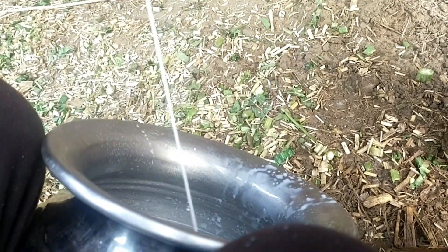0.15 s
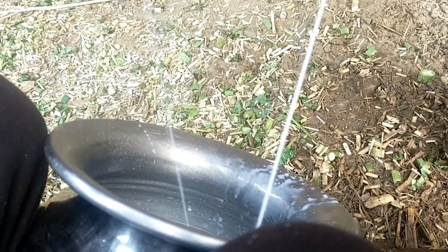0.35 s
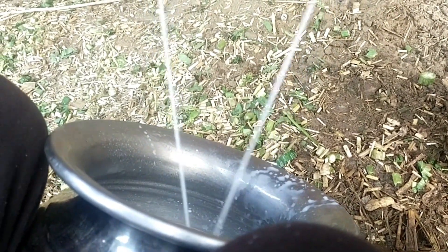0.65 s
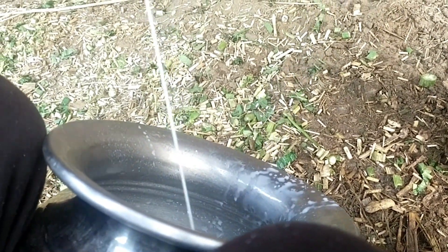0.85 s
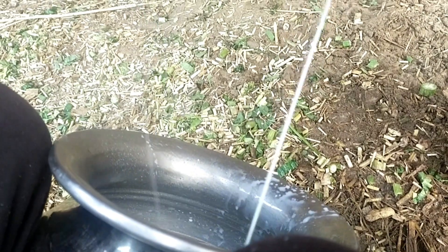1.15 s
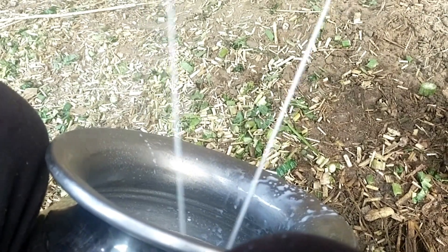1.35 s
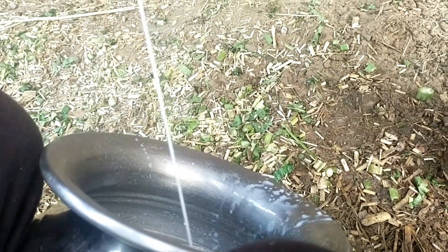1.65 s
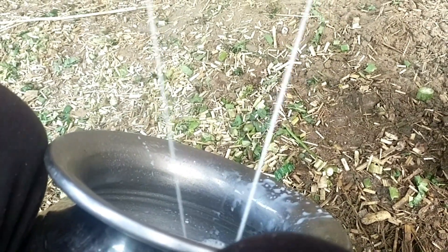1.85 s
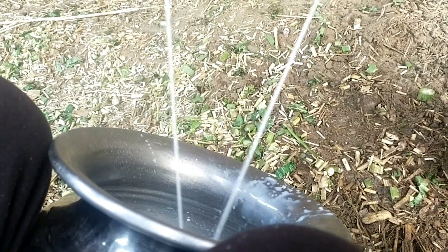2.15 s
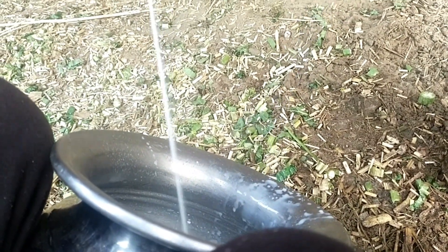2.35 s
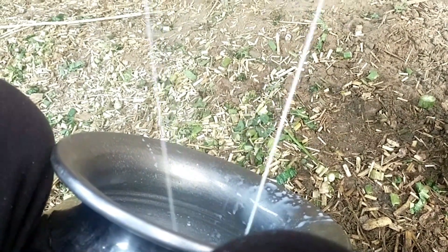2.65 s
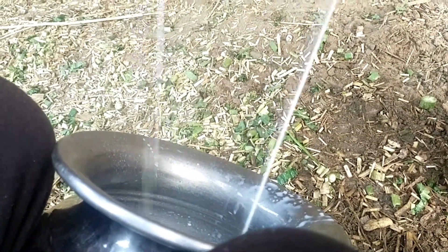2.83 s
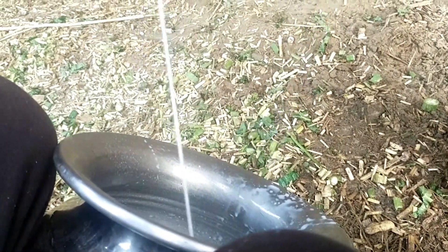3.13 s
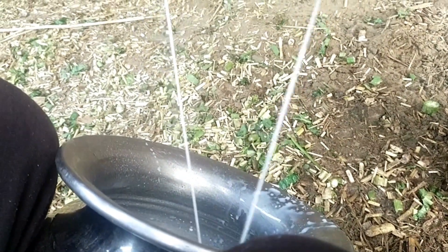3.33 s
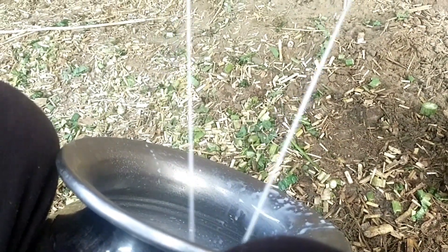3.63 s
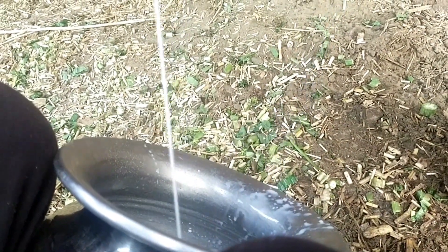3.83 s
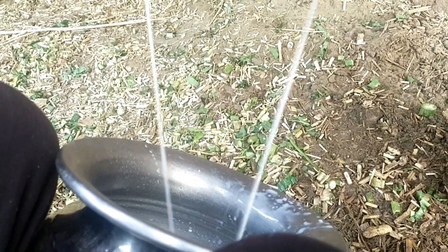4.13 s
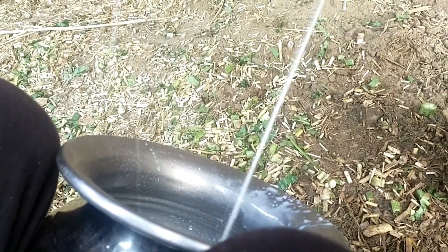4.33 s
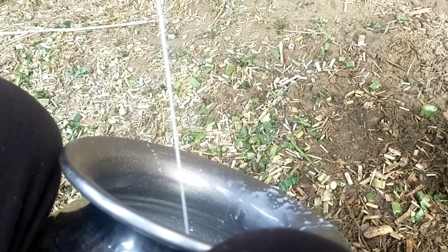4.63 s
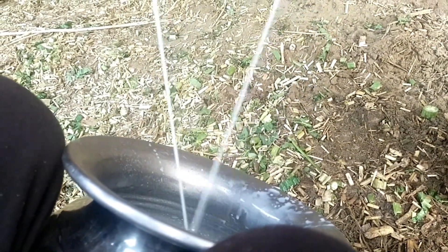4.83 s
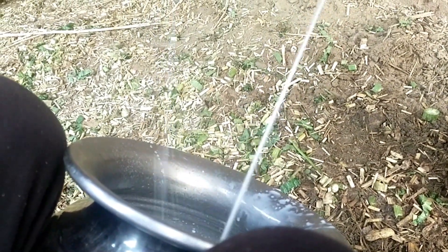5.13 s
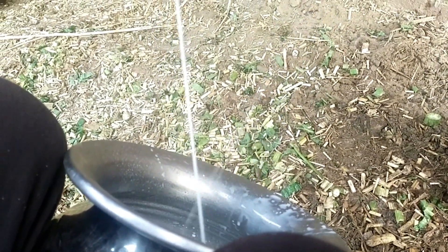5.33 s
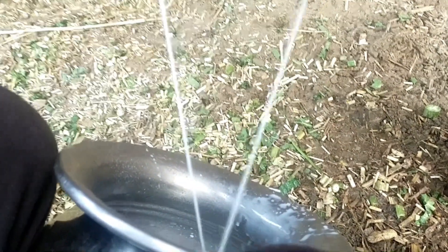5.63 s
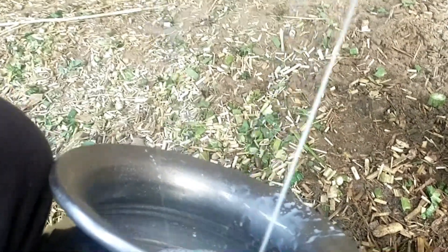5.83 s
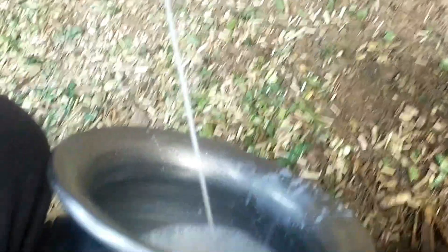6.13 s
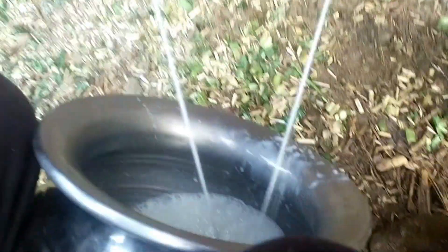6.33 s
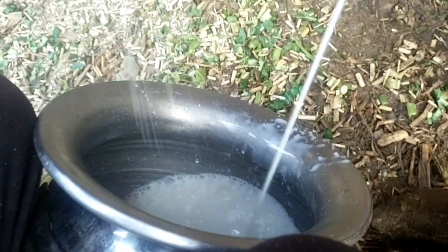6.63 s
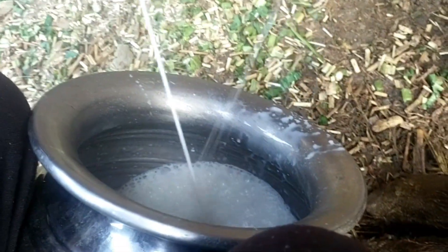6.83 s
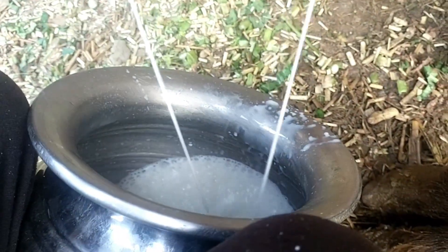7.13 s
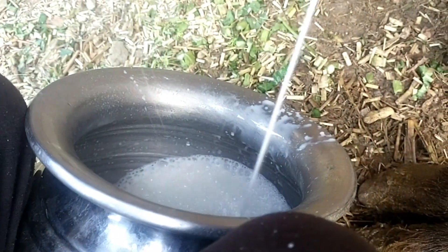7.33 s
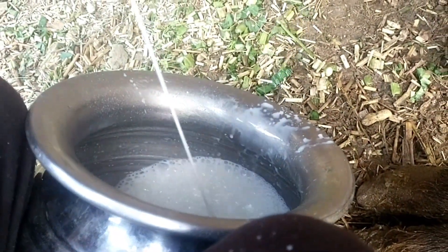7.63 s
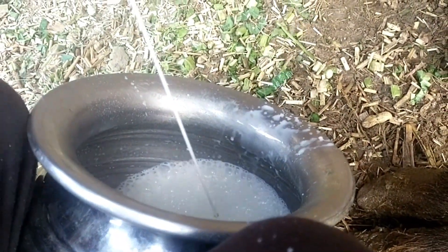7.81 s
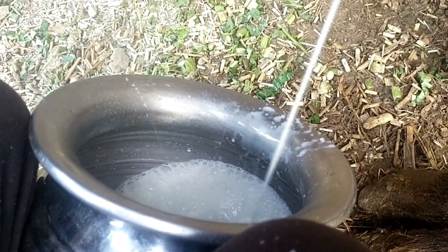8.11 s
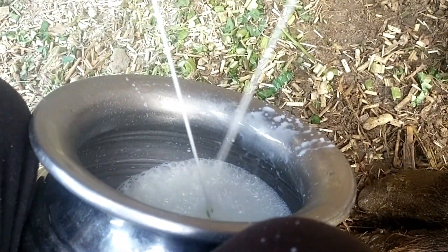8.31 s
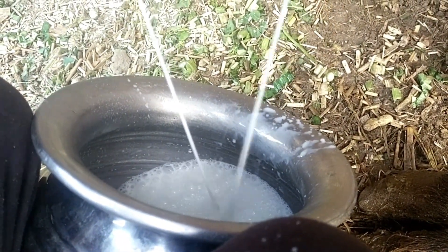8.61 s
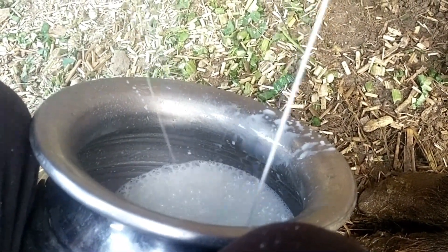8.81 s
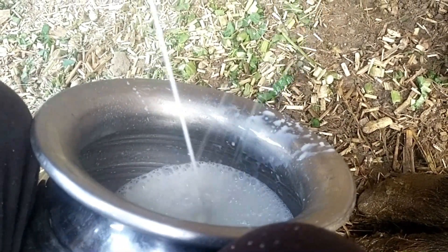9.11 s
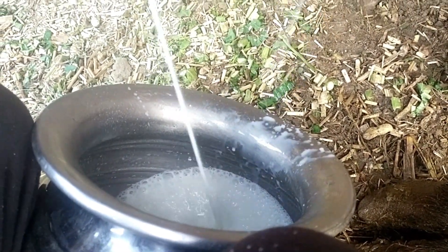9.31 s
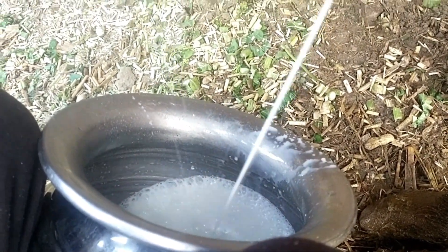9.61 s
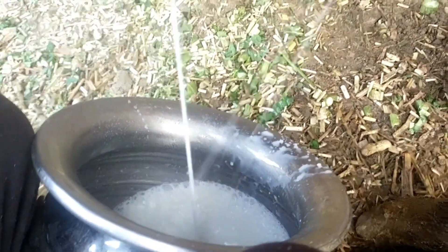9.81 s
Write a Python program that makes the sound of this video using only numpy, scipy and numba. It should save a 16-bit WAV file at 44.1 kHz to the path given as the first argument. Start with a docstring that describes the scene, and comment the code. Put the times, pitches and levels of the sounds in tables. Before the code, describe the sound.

Two hand-milked jets squirt in quick alternation into a frothy metal pot, with hollow boom, bright hissing splash, gulping bubbles and small plops.

```python
"""A hollow, milky boom and a bright splash open the scene: two hand-milked jets take turns plunging into froth.
The pot is metal and narrow-necked, and stands outdoors over a faint low rumble.
Torn noise, the churning milk, drives banks of resonances: boom, ring of the neck, splash and fizz.
Big bubbles gulp as decaying sines; slugs of milk plop in as short sine bursts with spatter.
The left microphone faces the pot's mouth, the right one is shaded."""
import sys
import numpy as np
from scipy import signal
from scipy.fft import rfft, irfft
from scipy.io import wavfile
from scipy.ndimage import uniform_filter1d
from numba import njit

SR = 44100
rng = np.random.default_rng(int(sys.argv[2]) if len(sys.argv) > 2 else 0)


def transcribe(u):
    """Save the signal u as a 16-bit wav file named by the first command-line argument.

    u: samples, shape (n,) or (channels, n), limited to [-1, 1]; the rate is SR.
    q: integer samples, one column per channel.
    """
    v = np.clip(np.atleast_2d(u).T, -1, 1)
    q = np.round(v * 32767).astype(np.int16)
    wavfile.write(sys.argv[1], SR, q)


N = 439236
STEP = 20   # samples between the points of slow controls


def from_db(db):
    """Decibels to gain."""
    return 10 ** (np.asarray(db) / 20)


def rms_one(x):
    """Scale to unit power."""
    return x / np.sqrt(np.mean(x ** 2) + 1e-20)


def at_hz(points, hz):
    """Read a (Hz, value) table on a log frequency axis."""
    points = np.array(points)
    return np.interp(np.log(hz), np.log(points[:, 0]), points[:, 1])


def over_time(points):
    """Read a (seconds, value) table at every sample."""
    return np.interp(np.arange(N) / SR, *np.transpose(points))


def drift(rate_hz):
    """Slow chance of spread 1: sparse noise through a double one-pole low-pass."""
    r = np.exp(-2 * np.pi * rate_hz * STEP / SR)
    noise = rng.standard_normal(N // STEP + 4002)
    slow = signal.lfilter([1], [1, -2 * r, r * r], noise)[4000:]   # drop the settling of the filter
    return np.interp(np.arange(N) / STEP, np.arange(len(slow)), rms_one(slow - slow.mean()))


def resonance(x, hz, width_hz):
    """Two-pole resonance with unit gain on top."""
    r = np.exp(-np.pi * width_hz / SR)
    feedback = [1, -2 * r * np.cos(2 * np.pi * hz / SR), r * r]
    return signal.lfilter([(1 - r * r) / 2, 0, (r * r - 1) / 2], feedback, x)


# Balance between the microphone facing the pot and the shaded one.
# Each row: frequency in Hz, left over right in dB.
MICROPHONE_SHADE = [(60, 0), (100, -1), (220, -4.5), (600, -0.5), (1100, 3.5), (1550, -4), (2000, 5),
                    (2700, 0), (3450, 15), (4050, 7), (5050, 8), (5650, 22), (6800, 11), (11500, 14),
                    (15000, 7)]


def shaded(hz):
    """Left and right gains at a pitch: the balance is split evenly, half up on the left, half down on the right."""
    return from_db(at_hz(MICROPHONE_SHADE, hz) * np.array([[.5], [-.5]]))


# Tone of the open air. Each row: frequency in Hz, relative level in dB per Hz.
YARD_SPECTRUM = [(12, -46), (43, -25), (90, -4), (120, -30), (200, -120)]
YARD_DB = -63   # level of the whole rumble


def yard():
    """Faint low rumble of the open air: shaped noise, nearly the same on both sides."""
    middle, side = rng.standard_normal((2, N))
    white = middle + 0.083 * side * [[1], [-1]]
    hz = np.maximum(np.fft.rfftfreq(N, 1 / SR), 1)
    rumble = irfft(rfft(white) * from_db(at_hz(YARD_SPECTRUM, hz)), N)
    return from_db(YARD_DB) * rms_one(rumble)


# Big bubbles gulping under the froth, ringing the air in the pot.
# Each row: start in seconds, peak level in dB before shade and low cut, pitch in Hz.
BUBBLE_GULPS = [(0.109, -0.5, 290), (0.188, -26, 283), (0.374, -20, 616), (0.523, -9, 308),
                (0.636, -13, 294), (0.784, -4, 298), (1.03, -9, 240), (1.191, -16, 570), (1.274, -10, 275),
                (1.41, -20, 646), (1.488, -9.5, 633), (1.535, -0.5, 300), (1.888, -13, 567),
                (1.901, -6.5, 298), (1.961, -16, 316), (1.993, -19, 570), (2.159, -4.5, 318),
                (2.264, -7, 251), (2.348, -14, 706), (2.415, -14, 606), (2.796, -3, 294), (2.957, -17, 579),
                (3.029, -5, 307), (3.073, -13, 576), (3.03, -11, 590), (3.109, -12, 276), (3.12, -15, 584),
                (3.218, -4, 286), (3.838, -12, 615), (3.93, -6, 607), (4.623, -13, 615), (4.659, -14, 615),
                (4.69, -12, 600), (4.738, -5, 275), (5.034, -13, 590), (5.269, -8, 292), (5.439, -3, 310),
                (6.64, -21, 689), (6.905, -19, 303), (7.404, -8, 259), (7.601, -25, 610), (8.029, -16, 530),
                (8.383, -14, 549), (8.414, -12, 556), (8.977, -6.5, 245), (9.002, -16, 552),
                (9.484, -15, 568), (9.568, -8.5, 297), (9.885, -24, 567)]
GULP_RISE, GULP_FALL = 0.27, 4   # time constants of swell and fade, in cycles
GULP_CUT_HZ = 170   # low cut keeps the gulps free of thumps


def gulps():
    """Trapped air rings like a struck bubble: each gulp swells within a cycle and dies away at its pitch."""
    length = 6000
    out, t = np.zeros((2, N + length)), np.arange(length) / SR
    for start_s, peak_db, hz in BUBBLE_GULPS:
        cycles = t * hz
        swell = (1 - np.exp(-cycles / GULP_RISE)) ** 2
        ring = swell * np.exp(-cycles / GULP_FALL) * np.sin(2 * np.pi * cycles)
        i = round(start_s * SR)
        out[:, i:i + length] += from_db(peak_db) * shaded(hz) * ring / ring.max()
    low_cut = signal.butter(4, GULP_CUT_HZ, "high", fs=SR, output="sos")
    return signal.sosfilt(low_cut, out[:, :N] + 1e-18)


# Slugs of milk plopping in. Each row: start in seconds, level of the whole slug in dB,
# pitch in Hz, relative level of its spatter in dB, length in seconds.
MILK_SLUGS = [(0.661, -2.5, 3220, -24, 0.011), (0.768, -6, 3470, 1.5, 0.0074),
              (1.379, -10, 3260, -18, 0.016), (1.491, -8.5, 1120, -21, 0.015),
              (1.528, -5, 1090, -19, 0.0094), (1.853, -2, 1010, -26, 0.0057), (1.886, -1, 1016, -26, 0.014),
              (1.925, -1, 1120, -13, 0.0073), (2.264, -12, 1030, -14, 0.0087),
              (2.416, -8, 1110, -9, 0.0093), (2.684, -3, 1020, -1, 0.0092), (2.864, -11, 2330, -12, 0.0093),
              (3.489, -9, 3370, -2, 0.0087), (3.936, -6, 1110, -6, 0.0065), (4.213, -5.5, 3580, -1, 0.008),
              (5.001, -3.5, 3460, -5, 0.0069), (5.03, -4.5, 1100, -5, 0.013),
              (5.385, 2.5, 1090, 0.5, 0.0051), (5.65, -2, 1066, -24, 0.016), (5.689, -1, 1003, -8, 0.013),
              (5.796, -4, 1070, -7, 0.0098), (5.836, -5, 1030, -21, 0.0095), (6.088, -5.5, 3730, -19, 0.01),
              (6.107, -2.5, 1150, -4, 0.0058), (6.136, -1, 1170, 2.5, 0.007),
              (6.195, -3, 5730, -11, 0.0043), (6.359, -1.5, 3600, 1, 0.011), (6.476, 6, 3250, -17, 0.0023),
              (6.516, 0, 1050, 1.5, 0.0071), (6.533, 4.5, 1070, -20, 0.0053), (6.544, 0, 3540, 1, 0.0052),
              (6.894, 3.5, 1200, -17, 0.0067), (7.247, -8, 1950, 4, 0.011), (7.268, 2.5, 2330, -5, 0.0039),
              (7.28, -7, 2440, -3, 0.009), (7.438, -9, 2410, -25, 0.013), (7.615, -1, 2410, -17, 0.019),
              (7.631, 2, 1160, -3, 0.0057), (7.832, -1.5, 920, -4.5, 0.0087), (8, 2, 1000, -10, 0.0057),
              (8.011, 0, 3760, 2.5, 0.0048), (8.036, -3.5, 3320, 0.5, 0.0068), (8.374, -5, 3600, 4, 0.014),
              (8.44, -15, 1130, -11, 0.0073), (8.466, -6, 1040, -15, 0.0048), (8.775, 0, 2400, 3.5, 0.0077),
              (9.022, -7, 1000, -4, 0.0059), (9.328, -1, 3660, -4, 0.0077), (9.497, -7.5, 3460, 5, 0.0089)]
# What the spatter rings. Each row: frequency in Hz, width in Hz, relative level in dB.
SPATTER_MODES = [(1150, 200, -6.5), (1780, 460, -8), (2200, 540, -2.5), (3660, 440, -3), (4300, 260, -8),
                 (5400, 430, -8)]
SPATTER_FADE = 1.1   # decay in nepers over the slug's length
SPATTER_DROPS_DB = 8.5   # unevenness of the spatter
PLOP_DB = -10   # trim of the ringing air pocket


def spatter_bursts(t):
    """Noise in uneven steps, one burst a slug, that swells, fades and rings the spatter resonances."""
    uneven = np.repeat(rng.standard_normal((len(MILK_SLUGS), 30)), 50, axis=1)
    noise = rng.standard_normal((len(MILK_SLUGS), len(t))) * from_db(SPATTER_DROPS_DB * uneven)
    length_s = np.array(MILK_SLUGS)[:, 4:]
    noise = t / length_s * np.exp(1 - SPATTER_FADE * t / length_s) * noise
    # before ringing, energy goes with length
    noise = noise * np.sqrt(length_s * SR / np.sum(noise ** 2, axis=1, keepdims=True))
    return sum((-1) ** k * from_db(level_db) * resonance(noise, hz, width_hz)
               for k, (hz, width_hz, level_db) in enumerate(SPATTER_MODES))


def slugs():
    """Each slug traps a pocket of air that rings inside a short burst of spatter."""
    out, t = np.zeros((2, N)), np.arange(1500) / SR
    for (start_s, level_db, hz, splash_db, length_s), burst in zip(MILK_SLUGS, spatter_bursts(t)):
        hump = np.sin(np.pi * np.minimum(t / length_s, 1)) ** 2
        plop = from_db(PLOP_DB) * shaded(hz) * hump * np.sin(2 * np.pi * hz * t)
        splash = from_db(splash_db + np.array([[1.5], [-5.0]])) * burst   # louder on the left
        i = round(start_s * SR)
        out[:, i:i + len(t)] += (from_db(level_db) * (plop + splash))[:, :N - i]
    return out


@njit
def wandering(x, twice_cos, r):
    """Two-pole resonance whose centre moves from sample to sample; unit gain on top."""
    y = np.zeros_like(x)
    for c in range(x.shape[0]):
        for i in range(2, x.shape[1]):
            fresh = (1 - r * r) / 2 * (x[c, i] - x[c, i - 2])
            y[c, i] = fresh + r * twice_cos[i] * y[c, i - 1] - r * r * y[c, i - 2]
    return y


# How alike the two microphones sound. Each row: frequency in Hz, likeness from 0 to 1.
SIDE_LIKENESS = [(60, .9), (300, .99), (600, .96), (1200, .8), (2400, .7), (5000, .6), (10000, .25)]
WANDER, WANDER_RATE_HZ = 0.015, 4   # slow random wander of the resonances: spread as a share of pitch
SKIRT = 5.65   # a second, wider pass darkens the valleys: its width over the first


def pot(drive, modes, patchy_db, patch_rate_hz, favoured_hz=None, focus_db=0):
    """Parallel resonances of the pot that share out a steady power, swelling and fading at random."""
    out, power = 0, 0
    detune = 1 + WANDER * drift(WANDER_RATE_HZ)
    for k, (hz, width_hz, level_db) in enumerate(modes):
        twice_cos = 2 * np.cos(2 * np.pi * hz * detune / SR)
        narrow = wandering(drive, twice_cos, np.exp(-np.pi * width_hz / SR))
        left, other = resonance(narrow, hz, SKIRT * width_hz)
        alike = np.clip(at_hz(SIDE_LIKENESS, hz), 0, 1)
        right = alike * left + np.sqrt(1 - alike ** 2) * other
        gain_db = level_db + patchy_db * drift(patch_rate_hz)
        if favoured_hz is not None:   # focus_db lost per tenth of an octave off the favoured pitch, up to three
            gain_db = gain_db - focus_db * np.minimum(10 * abs(np.log2(hz / favoured_hz)), 3)
        gain, shade = from_db(gain_db), shaded(hz)
        out = out + (-1) ** k * gain * shade * [left, right]
        power = power + gain ** 2 * width_hz * shade.sum() ** 2
    return out / np.sqrt(power)


def band(x, low_hz, high_hz):
    """Keeps the valleys between groups of resonances dark; the middle of the pair gets unit power."""
    x = signal.sosfilt(signal.butter(4, [low_hz, high_hz], "band", fs=SR, output="sos"), x)
    return x / np.sqrt(np.mean(x.mean(0) ** 2))


# Stretches of sound between changes of level or colour.
# Each row: start in seconds, middle level in dB of churn, belly, throat, neck, shoulder, lip, cheek, mouth,
# flare, rim, fizz and spray, start-to-end change in dB of belly, throat, splash and hiss, surge at the start in dB,
# favoured belly, neck and mouth pitch in Hz, mouth glide from first to second half in Hz, favoured rim pitch in Hz.
STRETCHES = [(0.0, -36, -14, -29, -32.5, -38.5, -34.5, -38.0, -27.5, -37, -28.5, -45, -42.5, 2.5, -14, -6.5, 2, 8, 295, 1100.0, 3450, 450.0, 5570),
             (0.2, -36, -14, -36.0, -36.5, -42.0, -45, -36.5, -28, -40.5, -27.5, -41, -42, -5, 3.0, -19, -8, -4, 288, 1030, 3820.0, -460.0, 5650),
             (0.4, -31, -14, -32.5, -30, -43.0, -36.0, -28.5, -28.0, -36, -23.5, -39, -40.5, -2.5, -4, -1.5, 2, 20, 290, 1160.0, 3140, 30.0, 5790.0),
             (0.61, -35.5, -12.0, -34.0, -34.5, -42, -32, -32, -27.5, -30.5, -28, -43, -46, -6, 8.0, -3, 1, 3, 293, 1140, 3180, -60.0, 5460.0),
             (0.74, -33, -12.5, -28.5, -28.5, -37, -30.5, -31, -27.5, -36.5, -33.5, -50, -44.0, -2.5, -19, -5, 1, 5, 308, 1100, 3530.0, 140.0, 5900),
             (0.87, -31.5, -15, -31.5, -24.5, -33.5, -32, -22, -21.5, -29.5, -24.5, -37, -41.0, -1, -8, 7, 4, -6, 284, 1046, 3800, 110.0, 5550),
             (1.04, -35.0, -12.5, -32.5, -26.5, -33.5, -42, -32, -31, -39.0, -28, -44, -40.5, 6, 4, 5, 2, -5, 290, 1064, 3300, -510.0, 5400),
             (1.23, -40, -11.5, -40, -36, -50.5, -44.5, -45, -29.5, -38, -31.5, -50.0, -49, -3, -11, -3, 3, -19, 282, 1115, 3100, -30.0, 5600),
             (1.41, -32.0, -11, -29, -36, -60, -40, -49.5, -40, -31.5, -32, -55, -52, 3, 6.5, -5, 0, 2, 283, 1070, 3460, 350.0, 5800.0),
             (1.51, -34, -17.5, -28, -26.5, -38, -32, -37, -26.5, -34, -28.5, -43, -41, 13, 16, -3, 2, -2, 300, 1095, 3500, 50.0, 5760),
             (1.64, -35.5, -14, -28.5, -28.5, -32, -29, -26.5, -21, -27, -25, -39, -36.5, 7, 7, 1, 1.5, -2, 288, 1044, 3800, 10.0, 5830),
             (1.82, -32, -14.5, -29, -25.5, -34.0, -41, -33, -29, -37, -27.5, -41, -42, 2, 13, 12, 5, -14, 293, 1040.0, 3870.0, 300.0, 5600),
             (1.98, -32, -14, -33, -35.5, -47, -37.5, -48, -37.5, -38, -31, -50.0, -49, -1, -1, -1, 7, 8, 296, 1045, 3470, 100.0, 5900),
             (2.16, -33, -14, -30.5, -34.5, -51, -35.5, -47.5, -38, -30.5, -29.5, -56, -47.5, 2, 1.0, -1, -2.0, 11, 307, 1030.0, 3620, -100.0, 5830),
             (2.29, -36, -14.5, -31.5, -31, -41.0, -36, -44, -31.5, -32, -32, -46, -45, 1, 1, 3, 10, 7, 292, 1020, 3430, 90.0, 5800),
             (2.47, -40, -17.5, -35, -29.0, -32.5, -32.5, -29, -20.5, -31, -23, -41, -42.5, 6.5, -14, -6.5, -11, -11, 286, 1000, 3770, 70.0, 5750),
             (2.73, -41, -14, -31, -36.0, -44, -39, -45, -35.5, -40, -33, -39, -47.5, 2, -10, -11, -8, 2, 287, 1070, 3100, -40.0, 5600),
             (2.86, -41, -15.0, -32, -32.5, -40.5, -27.5, -42, -25, -24.5, -25.5, -37, -39, 2, 12, 3.5, 2.5, 0.3, 287, 1090, 3320, 90.0, 5800),
             (3.2, -45.5, -19, -45, -35, -39.5, -39.5, -39, -27.5, -37, -26, -35.5, -42.5, -6.0, -12.5, -8, -10, -4, 280, 990, 3490, -30.0, 5700),
             (3.44, -40, -18.5, -34, -30.5, -35.5, -39, -43, -22, -35.0, -27, -33, -38.0, 10, 4.5, -3, 1.0, 12, 266, 1030.0, 3450, -150.0, 5250),
             (3.54, -42, -19.5, -47, -37.5, -48, -37.5, -35.5, -26.5, -29.5, -24.5, -35.5, -43, -8, 10, 1, -5, 4, 283, 1010, 3320.0, -290.0, 6000),
             (3.68, -43, -16.5, -34, -42, -55, -33.5, -49, -32.5, -29, -33.5, -40, -47.5, 7, -1, 1, -12, -1, 288, 1080, 3200, 20.0, 6200),
             (3.82, -32, -16, -26, -28, -40.0, -32.0, -46, -27.5, -29, -27.5, -39, -40, 5, 4, 1, 8, 10, 290, 1070, 3400, 310.0, 5800),
             (4.01, -37, -16.5, -44, -37.5, -39, -46, -35.5, -30, -33, -26.5, -37, -43, -10, 3, 1, 1.0, 0.3, 283, 1010, 3740, 0.0, 5650.0),
             (4.2, -39.5, -16, -27, -27, -31.5, -27.5, -34.5, -20, -41, -22, -35, -39, 10, 0.0, 3, 2, -0.5, 262, 1053, 3500, -160.0, 5600),
             (4.31, -41, -18, -35, -40, -41, -36, -42, -23, -27.5, -29, -37, -40, -2, -0.5, 4, -5, -2, 288, 1270, 3300, -30.0, 5650),
             (4.51, -32, -17, -27, -32.5, -39, -42.0, -57, -31, -28.5, -27, -41, -39.0, 10, 13, 1.5, -2, -7, 314, 1100, 3580, 140.0, 5740),
             (4.66, -44, -16, -28, -31, -45, -50.0, -55.0, -34.5, -39, -33.5, -39, -41.5, 2.0, 0, -6, -10, 0.3, 284, 1090, 3550.0, 30.0, 5850.0),
             (4.77, -37.5, -18.5, -34, -38.5, -51, -40, -45, -34.5, -41, -29.0, -40, -46.5, 0, 4, -3, -3, -2, 280, 1100, 3400, 40.0, 5600),
             (4.98, -42.0, -22.5, -28.5, -26, -32, -41.5, -36, -18.5, -32, -23.5, -36, -33.5, -1, -6, -2, -5, 10, 284, 1134, 3280, -100.0, 5600),
             (5.16, -33, -17.5, -31.5, -33, -42, -39.5, -55, -29.5, -26.5, -25, -37.5, -39, -6, -9, -5, -7, -14, 286, 1065, 3480, 50.0, 5600),
             (5.37, -36, -16.0, -29.5, -27, -40, -30, -47, -26.5, -28.5, -30.5, -36.5, -39.0, -1, -12, 10, -6, 7, 300, 1000, 3440.0, 110.0, 5750),
             (5.55, -38, -30.5, -38.5, -26.5, -36, -34, -37, -20.5, -29, -27, -33.5, -37.5, 6, 1.0, -4, 0, -2, 274, 1010, 3600, 30.0, 5160),
             (5.83, -36, -20.5, -34.5, -33.5, -47.5, -41.5, -39, -32.5, -33, -33, -41, -43.0, -2.5, 12, -3, 5, 11, 328, 1010, 3200, 20.0, 5300),
             (5.98, -30, -16.5, -37, -39, -54.0, -33, -35, -31.5, -27, -44, -50.5, -50.0, -5, -16, -7, -16, -2, 310, 1030.0, 3660.0, -170.0, 5800.0),
             (6.08, -31, -24, -29, -30.5, -37, -29, -33.5, -24.5, -28, -25.5, -35, -39, -3.5, -5, -8, -1, -4, 295, 1140, 3610.0, 20.0, 5800),
             (6.23, -40.5, -31.5, -39, -29.0, -35, -32.5, -30.5, -22, -28, -27.0, -42.5, -40.5, -4, 3, 7, 6, 2, 285, 1040, 3570.0, -110.0, 5430),
             (6.45, -36, -30.5, -28.5, -28.5, -29, -31, -28, -27, -37, -30.0, -45, -46, -3.0, -2, 2.5, -6, -11, 273, 1026, 3540, 130.0, 5600.0),
             (6.57, -40.5, -29.5, -35.5, -31, -38, -33.5, -35, -30.5, -32.5, -34.5, -48, -46.5, 13, -2, 3, -2, -8, 302, 1030, 3220.0, 190.0, 5630),
             (6.72, -44, -20.5, -30, -32.0, -43, -30.5, -31, -31, -30, -36.5, -47.0, -43.0, 5, -6, -6, -3, -14, 322, 1015, 3550, 90.0, 5280.0),
             (6.88, -38, -19, -31.5, -25.5, -34.5, -28.5, -35.5, -24, -25, -23.5, -40.5, -38.5, -3.5, -8, 1, 0.0, 14, 335, 1080, 3700, 20.0, 5580),
             (7.06, -44, -24.5, -36, -36, -34, -37.5, -45.0, -32, -37, -32, -48.0, -45, 7, 1, 0.0, -1, -9, 356, 960, 3520, -20.0, 5700),
             (7.24, -34, -28.5, -35.0, -30.0, -30, -29, -34.5, -22, -33.5, -33, -43.5, -41, -3.5, 3, -6, -2, 8, 293, 1010, 3470, -240.0, 5700),
             (7.33, -33.5, -21, -41.5, -32.5, -40, -30.5, -38.0, -32, -28, -34, -41.5, -42, 5, 16, 7, 2, -2, 274, 980, 3140, -180.0, 5130),
             (7.57, -34, -18.5, -24.5, -26, -42, -31, -33, -30.5, -31.5, -33, -42, -43.5, -4, 4, 15, 10, -11, 316, 1130, 3430.0, 50.0, 5400.0),
             (7.66, -37, -19.5, -33, -32, -36.5, -35, -46, -31, -32, -31.0, -49.5, -43, -18, -13, 3, -7, 8, 306, 1026, 3660, 160.0, 5370),
             (7.81, -39.5, -27, -35, -26, -29.5, -31, -40, -24.5, -27.5, -29, -51, -39.5, -2.5, -1, -0.5, -9, -4, 326, 950.0, 3600, 150.0, 5300),
             (7.97, -34, -26.5, -30, -24, -25.5, -24.5, -35, -20.5, -28, -37, -47, -42.5, -4, -1.0, 7, 0, 3, 280, 1010, 3500, -50.0, 5350.0),
             (8.07, -39, -24.5, -38.5, -35.0, -40.5, -32.0, -31, -25.5, -29.5, -32.5, -44, -43, 16, 12, 4, 1, 0.3, 264, 1044, 3530, 290.0, 5650.0),
             (8.36, -30.5, -21, -29, -23, -34.0, -33, -40, -28.0, -35, -31.5, -52, -43.5, -7.0, -7.5, 8, -2, -3, 285, 1050, 3630, 130.0, 5250),
             (8.53, -41, -29.0, -47, -21, -27.5, -27.5, -30, -19, -24, -21, -40, -37.5, -1.0, -5.0, 5, -4, 12, 280, 1010, 3940, 220.0, 5200),
             (8.64, -45.0, -27, -42, -26.5, -29, -29.5, -38, -24, -27, -26.5, -43, -38.5, 9, 27, -1.5, -7, -3, 300, 967, 3570, -60.0, 5250),
             (8.81, -37, -19.5, -35.5, -31, -40, -34.0, -34, -28, -33, -34.5, -44.5, -41.0, -8, 1.0, 1, 4, 11, 281, 1030, 3330.0, 20.0, 5790.0),
             (9.0, -35.5, -20, -28.0, -29, -39.5, -28.5, -34, -27, -30, -30, -48.5, -43.5, -6, -1, -4, 6, 1, 297, 1070, 3630, 10.0, 5380.0),
             (9.22, -43.5, -25, -41, -30.0, -29.5, -28.5, -34, -25, -28.5, -25, -44.5, -39, -13, 7, 4.5, 2, 17, 293, 944, 3600, -40.0, 5440),
             (9.47, -31, -22, -25.5, -29, -31, -31.5, -39, -25.5, -36, -32, -57.5, -43.5, 5.0, -9, -9, -3, -1, 310, 935, 3430, -170.0, 5500),
             (9.65, -35.0, -15, -30, -32, -42, -37, -34.0, -23.5, -26, -24, -40, -38.5, 6, -14, 4, 2.0, 3, 283, 960.0, 3200, 120.0, 5660.0),
             (9.76, -39, -16.5, -38, -33.0, -44, -44.5, -36.5, -33, -40, -26.5, -53, -47, -6, 4, -8, 0.5, -5, 269, 994, 3350, -0.0, 5700),
             (9.87, -34, -16.5, -29.5, -27, -34, -35, -35, -25.5, -33, -24.5, -53, -35, 0.5, -3, -6, -3, 8, 282, 1180.0, 3440, 0.0, 5800)]
EASE_S, SURGE_S = 0.053, 0.0053   # one stretch eases into the next; half width of the surge
THROAT_SURGE, LIP_SURGE, MOUTH_SURGE = 0.47, 0.39, 0.17   # shares of the surge, which the neck takes in full
FLICKER_DB, LOW_FLICKER_DB = 0.8, 1.5   # random level flicker of splash and hiss, and of throat
FLICKER_RATE_HZ = 6.0
NECK_FOLLOWS = 0.87   # share of the splash change, flicker included
CHURN_FOLLOWS_BELLY = 0.26   # share of the belly change


def levels_and_pitches():
    """Levels of each group in dB, stretch after stretch, and the favoured pitches in Hz."""
    start, *columns = np.transpose(STRETCHES)
    t = np.arange(0, N, STEP) / SR
    row = np.maximum(np.searchsorted(start, t, "right") - 1, 0)
    length = np.diff(start, append=N / SR)
    through = (t - start[row]) / length[row] - .5   # -0.5 to 0.5 across a stretch
    (churn, belly, throat, neck, shoulder, lip, cheek, mouth, flare, rim, fizz, spray,
     belly_change, throat_change, splash_change, hiss_change, _,
     belly_hz, neck_hz, mouth_hz, glide_hz, rim_hz) = (c[row] for c in columns)
    surge = columns[16] @ np.exp(-.5 * ((t - start[:, None]) / SURGE_S) ** 2)
    flicker = FLICKER_DB * drift(FLICKER_RATE_HZ)[::STEP]
    low_flicker = LOW_FLICKER_DB * drift(FLICKER_RATE_HZ)[::STEP]
    splash = splash_change * through + flicker
    hiss = hiss_change * through + flicker
    boom = belly_change * through
    levels = [churn + CHURN_FOLLOWS_BELLY * boom,
              belly + boom,
              throat + throat_change * through + THROAT_SURGE * surge + low_flicker,
              neck + NECK_FOLLOWS * splash + surge,
              shoulder + splash + surge,
              lip + splash + LIP_SURGE * surge,
              cheek + splash + LIP_SURGE * surge,
              mouth + splash + MOUTH_SURGE * surge,
              flare + splash,
              rim + hiss, fizz + hiss, spray + hiss]
    pitches = [belly_hz, neck_hz, mouth_hz + 2 * glide_hz * through, rim_hz]
    eased = uniform_filter1d(np.array(levels + pitches), max(int(EASE_S * SR / STEP), 1), axis=1)
    eased = [np.interp(np.arange(N) / SR, t, c) for c in eased]
    return eased[:12], eased[12:]


# Resonances of the pot that each motion of the milk excites, from low to high.
# Each row: frequency in Hz, width in Hz, relative level in dB.
CHURN_MODES = [(70, 160, -28), (122, 113, -8), (189.4, 32, -1.5)]
BELLY_MODES = [(226.7, 30.3, 1.5), (245, 29.8, 2), (282.3, 29, 6), (330.5, 77, -6), (377, 67, -3)]
UPPER_BELLY_MODES = [(392, 72, 0)]   # just above the belly
THROAT_MODES = [(573.3, 76, 27), (684, 435, 3)]
NECK_MODES = [(932, 114, -4.5), (991.5, 39, 2.5), (1073, 89, -5), (1216, 180, -1.5), (1308, 74, 6.5)]
SHOULDER_MODES = [(1646, 113, 0), (2048, 180, 0)]
LIP_MODES = [(2354, 166, 9.5), (2600, 140, 6.5)]
CHEEK_MODES = [(2500, 420, 1), (2816, 76, 0.3), (2956, 96, 0.55)]
MOUTH_MODES = [(3077, 46, 2.1), (3224, 95, 2.8), (3390, 61, 1.3), (3537, 88, 0.67), (3710, 120, 1),
               (3860, 230, 0.78), (3905, 320, 2.4)]
FLARE_MODES = [(4170, 140, -1), (4370, 120, 2), (4540, 170, 0), (4814, 78, -2)]
RIM_MODES = [(4920, 160, 1), (5190, 38, 4.5), (5370, 90, 0), (5656, 68, -3.5), (5825, 85, -2),
             (6110, 89, -3.5), (6800, 240, -6)]
FIZZ_MODES = [(6560, 670, -7.5), (7460, 170, -5.5), (8240, 430, -3)]
SPRAY_MODES = [(8680, 530, 0.5), (9650, 620, 0), (10440, 320, 1), (10740, 1100, -5), (11830, 1400, 4.5),
               (13330, 230, 0.5), (14000, 620, -15), (15300, 480, -3)]
# The favoured shoulder pitch climbs. Each row: time in seconds, pitch in Hz.
SHOULDER_CLIMB = [(5.9, 1825), (6.7, 2030)]
# Level of the layer just above the belly, which swells from 5.4 s. Each row: time in seconds, level relative to
# the belly in dB.
UPPER_BELLY_LEVEL = [(5.4, -19), (5.9, -9.5), (7.4, -11), (8.0, -12)]
DROPS_PER_S, DROP_DB, DROP_SPREAD_DB = 300, 6, 2.5   # single drops standing out of the splash


def jets():
    """Noise in clumps, as the jets tear into drops, drives every part of the pot."""
    levels_db, (belly_hz, neck_hz, mouth_hz, rim_hz) = levels_and_pitches()
    churn, belly, throat, neck, shoulder, lip, cheek, mouth, flare, rim, fizz, spray = from_db(levels_db)
    shoulder_hz = over_time(SHOULDER_CLIMB)
    upper_belly = belly * from_db(over_time(UPPER_BELLY_LEVEL))
    clumps, drops = drift(38.0), drift(202.0)

    def torn(clump_db, drop_db):
        """Stereo noise whose level follows the break-up of the jet."""
        return rng.standard_normal((2, N)) * from_db(clump_db * clumps + drop_db * drops)

    drop_size_db = DROP_DB + DROP_SPREAD_DB * np.minimum(rng.exponential(1, N), 3)
    single = (rng.random(N) < DROPS_PER_S / SR) * from_db(drop_size_db)
    gurgle = torn(2.3, 2.5)
    splash = torn(1.88, 2.18) * (1 + single)
    rim_splash = torn(2.07, 2.43) * (1 + 0.37 * single)
    mist = rng.standard_normal((2, N)) * from_db(1.0 * clumps + 1.9 * drift(41.0) + 0.86 * drops)
    return (churn * band(pot(torn(1.2, 0.72), CHURN_MODES, 1.8, 2.1), 41, 270)
            + belly * band(pot(torn(0.35, 0.57), BELLY_MODES, 5.8, 7.1, belly_hz, 4.3), 144, 395)
            + upper_belly * band(pot(gurgle, UPPER_BELLY_MODES, 0, 5.0), 353, 465.6)
            + throat * band(pot(gurgle, THROAT_MODES, 6.6, 13.4), 405, 954)
            + neck * band(pot(gurgle, NECK_MODES, 6.0, 4.3, neck_hz, 6.7), 767, 1440)
            + shoulder * band(pot(splash, SHOULDER_MODES, 4.5, 5.8, shoulder_hz, 3.4), 1270, 1910)
            + lip * band(pot(splash, LIP_MODES, 6.8, 10.4), 1790, 2530)
            + cheek * band(pot(splash, CHEEK_MODES, 9.8, 7.6), 2630, 3330)
            + mouth * band(pot(splash, MOUTH_MODES, 3.5, 5.5, mouth_hz, 4.8), 3060, 4730)
            + flare * band(pot(splash, FLARE_MODES, 5.4, 3.7), 3880, 5100)
            + rim * band(pot(rim_splash, RIM_MODES, 3.2, 5.3, rim_hz, 4.3), 4820, 7700)
            + fizz * band(pot(torn(2.4, 0.91), FIZZ_MODES, 2.5, 1.0), 6330, 7920)
            + spray * band(pot(mist, SPRAY_MODES, 4.0, 9.0), 8200, 16000))


LEFT_LAG = 3   # samples


def scene():
    """Yard, gulps, slugs and jets; the sound reaches the left microphone a moment later."""
    left, right = yard() + gulps() + slugs() + jets()
    return np.array([np.roll(left, LEFT_LAG), right])


CUTOFF_HZ = 15700


def record(dry):
    """The highest peaks round off as the input overloads, and the top is cut."""
    rounded = 1.02 * dry / (1 + np.abs(dry) ** 6) ** (1 / 6)
    return signal.sosfilt(signal.cheby2(16, 70, CUTOFF_HZ, fs=SR, output="sos"), rounded)


dry = scene()
out = record(dry)
transcribe(out)
```